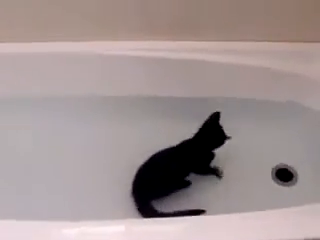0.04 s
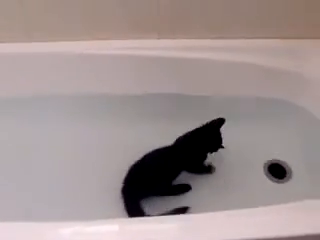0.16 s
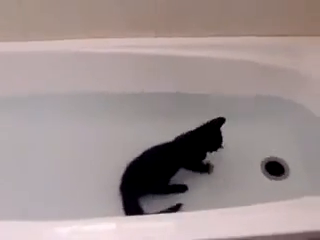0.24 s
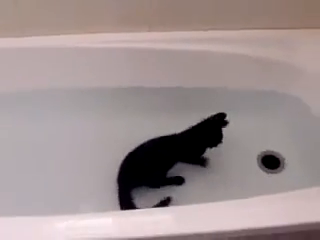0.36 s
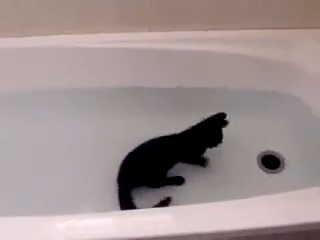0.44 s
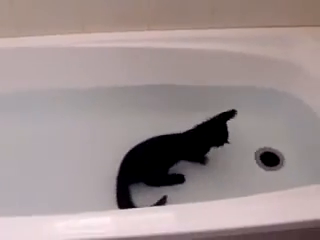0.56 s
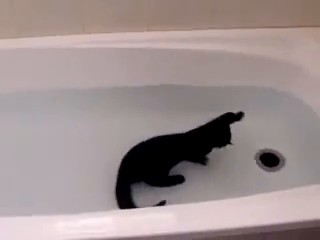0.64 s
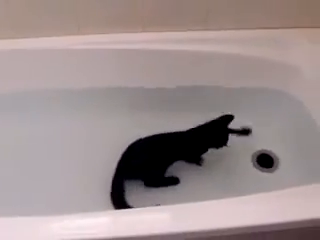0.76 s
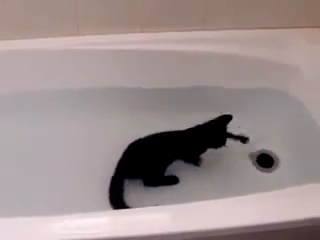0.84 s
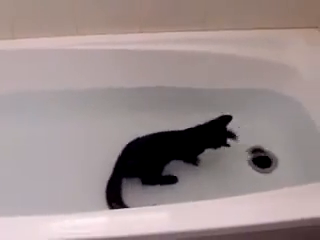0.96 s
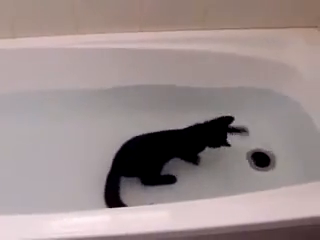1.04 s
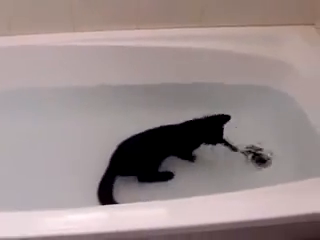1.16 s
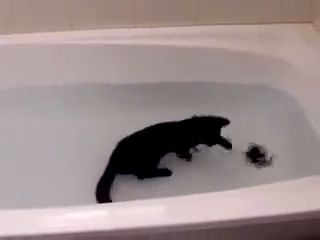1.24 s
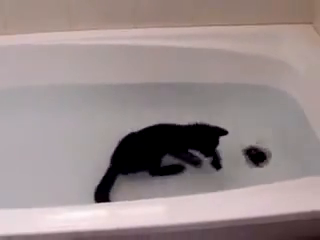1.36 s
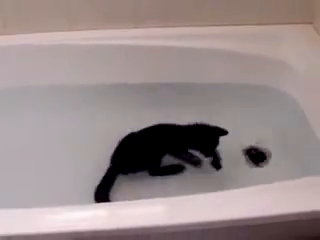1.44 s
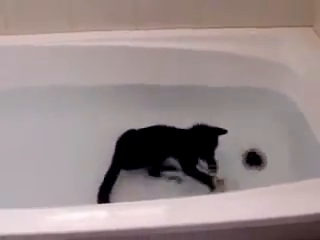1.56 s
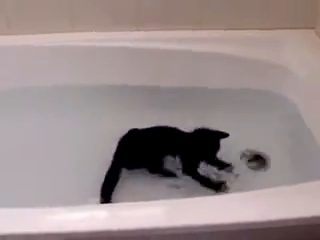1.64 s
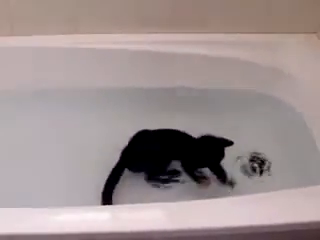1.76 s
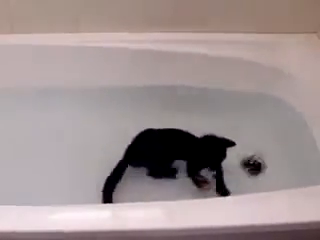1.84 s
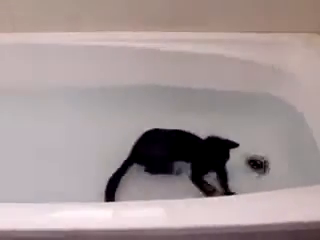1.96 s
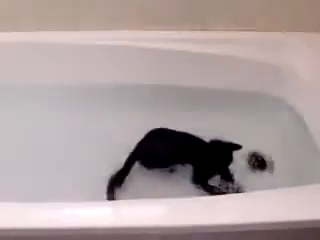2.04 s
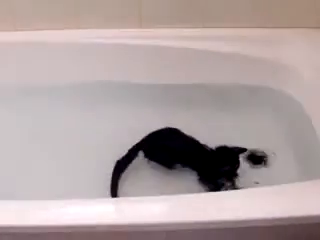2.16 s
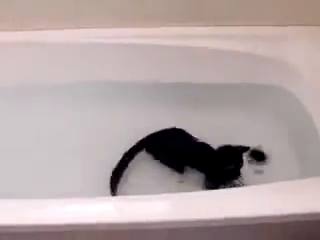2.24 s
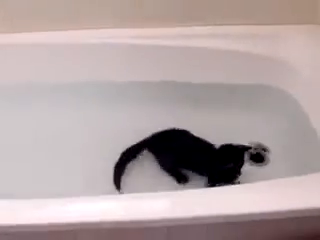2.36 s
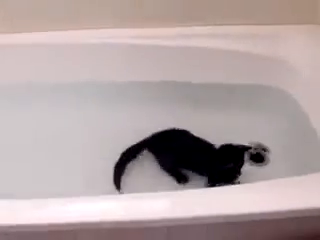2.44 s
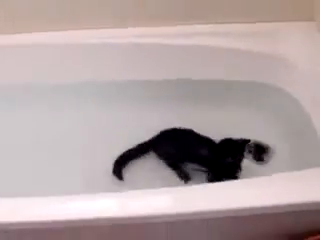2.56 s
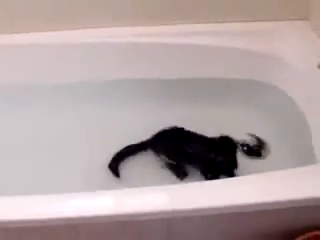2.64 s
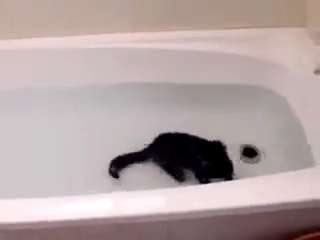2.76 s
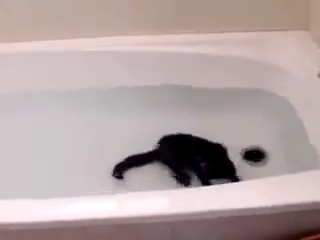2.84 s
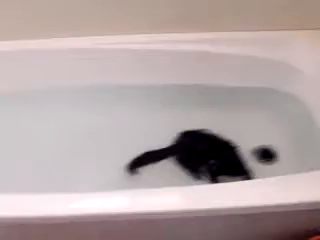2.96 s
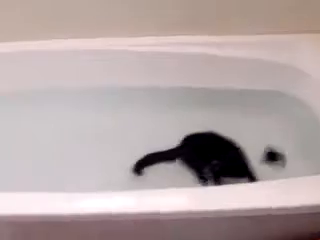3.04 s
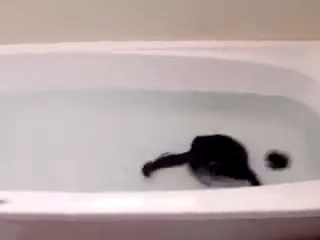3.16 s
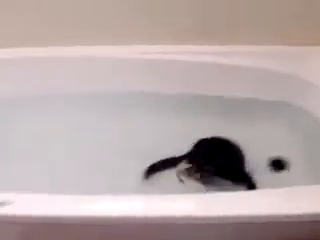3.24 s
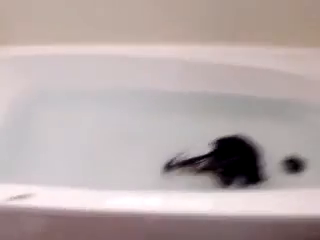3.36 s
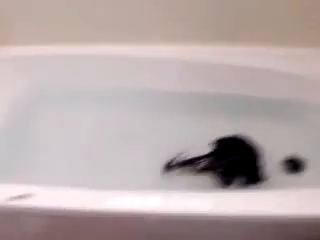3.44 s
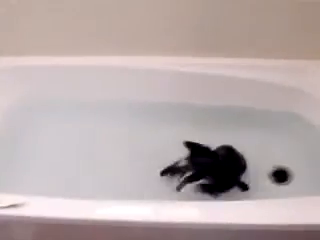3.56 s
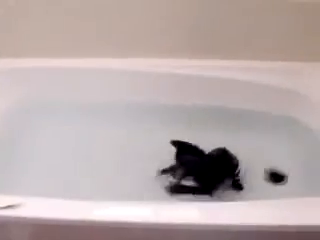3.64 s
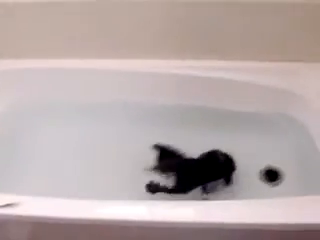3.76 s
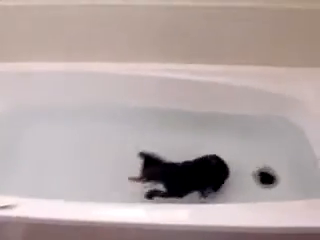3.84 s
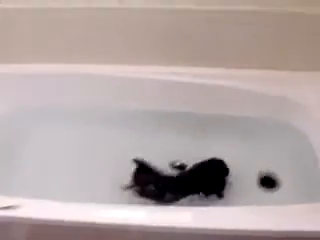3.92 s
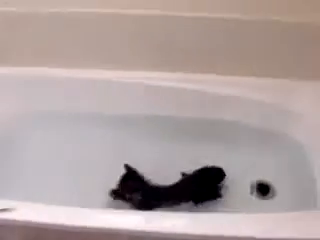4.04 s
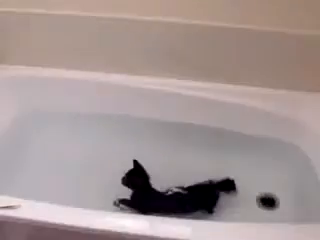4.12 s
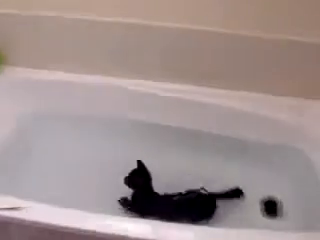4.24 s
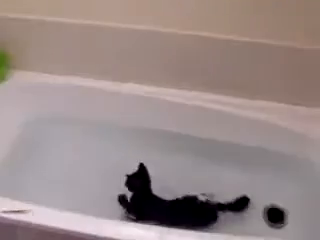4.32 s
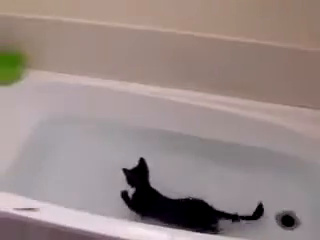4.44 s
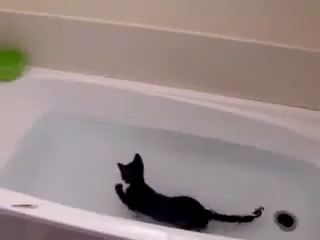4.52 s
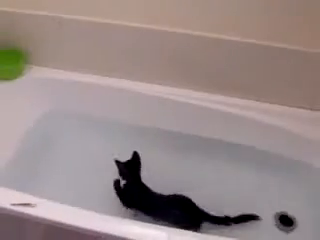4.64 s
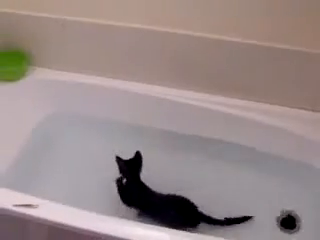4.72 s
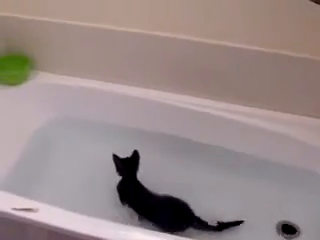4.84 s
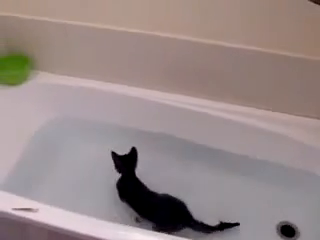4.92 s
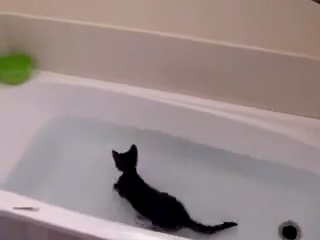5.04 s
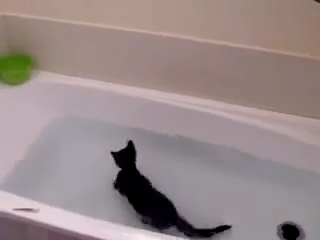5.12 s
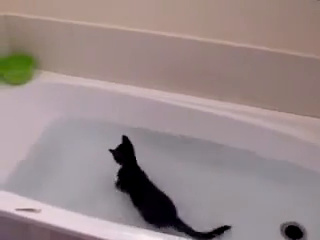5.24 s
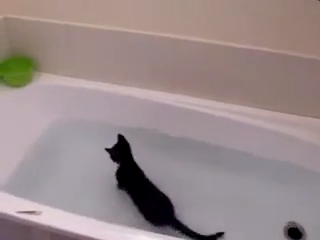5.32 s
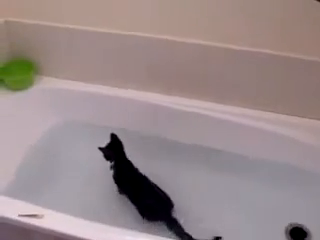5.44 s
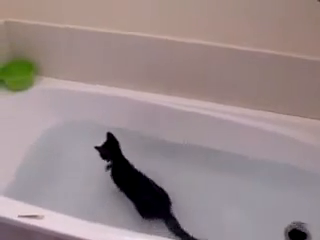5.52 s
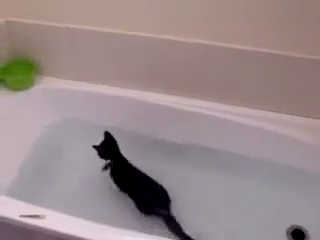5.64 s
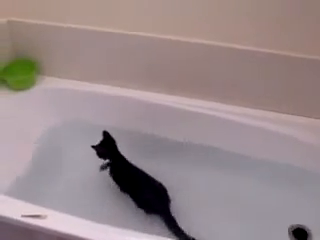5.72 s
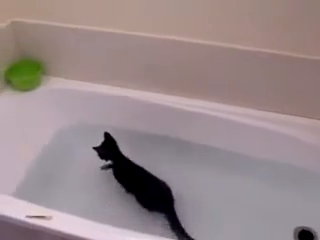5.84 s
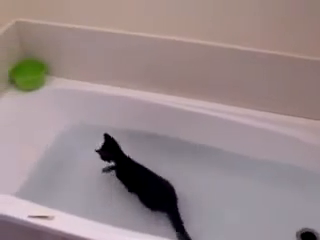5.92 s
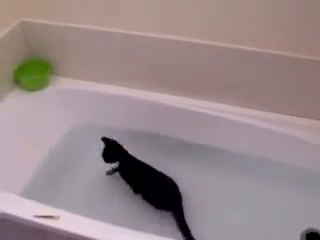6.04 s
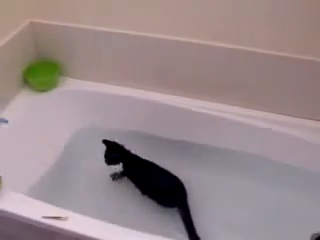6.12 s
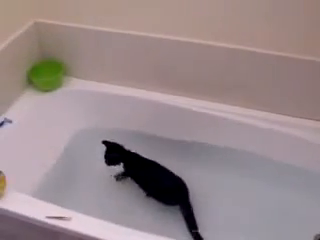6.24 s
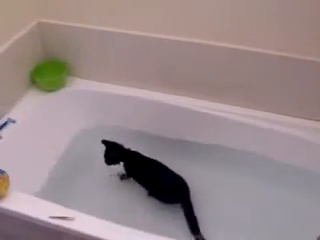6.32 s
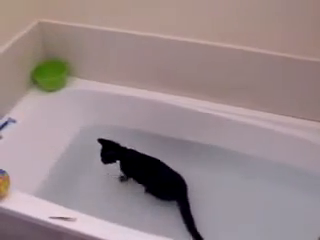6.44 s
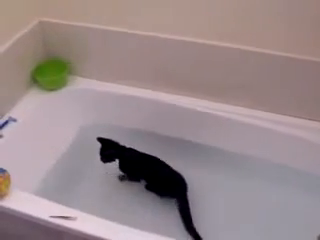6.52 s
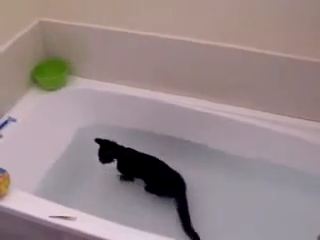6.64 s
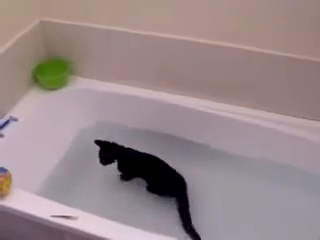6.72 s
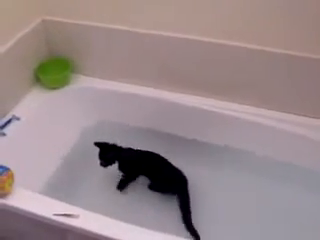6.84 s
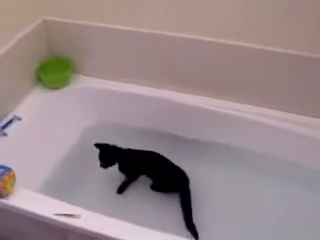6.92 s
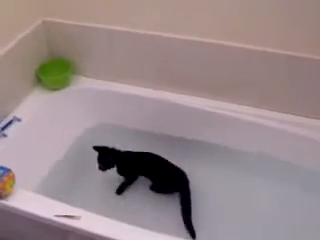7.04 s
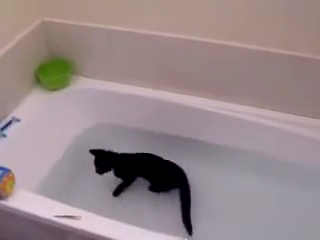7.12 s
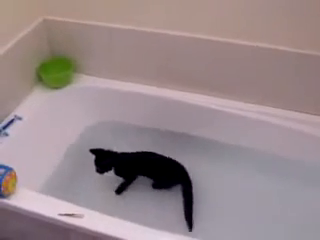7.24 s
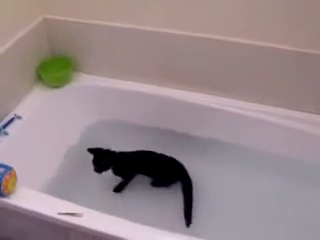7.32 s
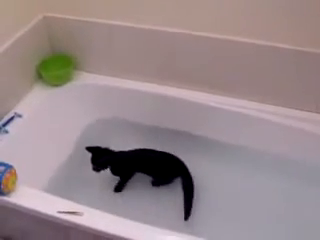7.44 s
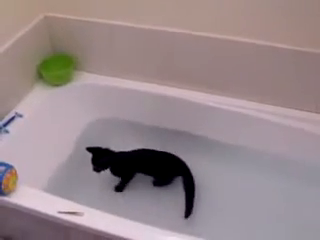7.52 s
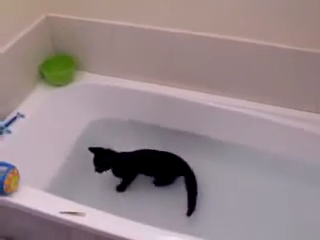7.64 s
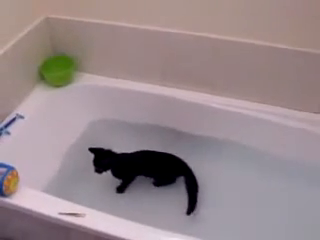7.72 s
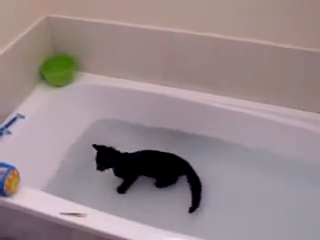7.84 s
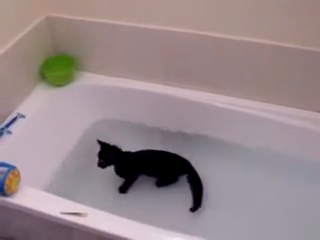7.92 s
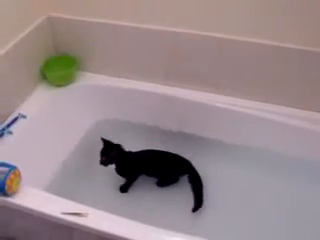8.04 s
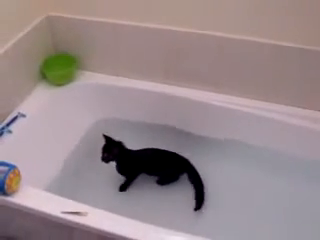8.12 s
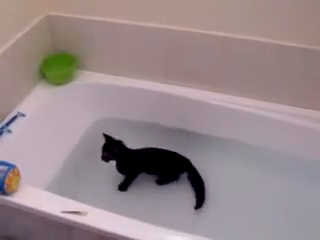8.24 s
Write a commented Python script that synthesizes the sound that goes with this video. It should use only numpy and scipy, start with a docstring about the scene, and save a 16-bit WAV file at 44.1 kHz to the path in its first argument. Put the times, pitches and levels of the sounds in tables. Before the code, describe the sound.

Soft hiss and low hum fill a tiled bathroom. After a second a kitten's paw slaps shallow bathtub water, and a run of bright splashes, drops and bubbly plops follows. It thins to near quiet, then a second splashy burst peaks with the hardest thumps. Drips die away, leaving faint room noise and a few dry plastic clicks close to the small, dull-trebled handheld microphone.

```python
"""In a tiled bathroom, a kitten paws and wades through shallow water in a bathtub.
Bubbles plop and slaps knock as short damped sines of climbing pitch; sprayed water is a dense patter of drops.
Noise that dies at its own speed at each pitch makes the room ring after the water.
The hand-held camera's plastic shell ticks, dry and close: short pushes ring its modes.
Under it lie shaped noise for a soft hiss, hum and grip rumble, and a few thin steady-pitched tones."""
import sys
import numpy as np
from scipy import signal
from scipy.fft import rfft, irfft, next_fast_len
from scipy.io import wavfile
from scipy.ndimage import uniform_filter1d, map_coordinates

SR = 44100
rng = np.random.default_rng(int(sys.argv[2]) if len(sys.argv) > 2 else 0)


def level_to_linear(level):
    """Convert decibel levels to linear amplitude factors, elementwise."""
    exponent = np.asarray(level, float) / 20
    return 10 ** exponent


def file_out(sig):
    """Save sig as 16-bit WAV at sys.argv[1]."""
    # one column per channel
    cols = np.atleast_2d(sig).T
    # limit, then scale
    lim = np.clip(cols, -1, 1)
    pcm = np.round(lim * 32767).astype(np.int16)
    wavfile.write(sys.argv[1], SR, pcm)


N = 364795  # length in samples


def unit(x):
    """Scale to an rms (average strength) of 1."""
    return x / np.sqrt(np.mean(x ** 2) + 1e-20)


def along(points, hz):
    """Read a curve of (Hz, value) points, with pitch on a log axis."""
    point_hz, value = np.transpose(points)
    return np.interp(np.log(hz + 1), np.log(point_hz + 1), value)


def curves(rows):
    """Turn each column after the time into one value per sample."""
    s, *columns = np.transpose(rows)
    return [np.interp(np.arange(N) / SR, s, column) for column in columns]


def wobble(rate):
    """A smooth random curve with rate knots a second."""
    knots = rng.standard_normal(int(N * rate / SR) + 4)
    return map_coordinates(knots, [np.arange(N) * rate / SR])


def filtered(x, response):
    """Multiply the spectrum of x by a response that depends on frequency."""
    m = next_fast_len(len(x) + 8192)
    return irfft(rfft(x, m) * response(np.fft.rfftfreq(m, 1 / SR)), m)[:len(x)]


def shaped_noise(shape):
    """Random noise with the spectrum of a table of (Hz, dB), at rms 1."""
    return unit(filtered(rng.standard_normal(N), lambda hz: level_to_linear(along(shape, hz))))


# Colour of the hiss after the microphone; only the shape counts.
# Columns: pitch_hz [Hz], level_db [dB per Hz]
HISS_COLOUR = [(530, -49.5), (900, -22.5), (941, -10.5), (1870, -10), (2680, -5.5), (3150, -6.5),
               (3410, -5), (5600, -15), (7750, -38), (10100, -59.5), (17000, -120)]


def hiss():
    """Steady noise, shaped so that the microphone's filter brings it to its listed colour."""
    return unit(filtered(rng.standard_normal(N), lambda hz: level_to_linear(along(HISS_COLOUR, hz) - along(MIC_RESPONSE, hz))))


def patchy(x, patchy_db):
    """Random gain patches some 300 Hz wide and 100 ms long make a noise lumpy."""
    z = signal.stft(x, nperseg=512)[2]
    field = uniform_filter1d(rng.standard_normal(z.shape), size=4, axis=0)
    field = uniform_filter1d(field, size=16, axis=1)
    return unit(signal.istft(z * level_to_linear(patchy_db * unit(field)), nperseg=512)[1][:N])


# Colour of the hum; only the shape counts.
# Columns: pitch_hz [Hz], level_db [dB per Hz]
HUM_COLOUR = [(65, -23), (110, -1), (300, -5), (550, -5.5), (800, -9), (1200, -14.5), (2000, -16),
              (4000, -120)]


def hum():
    """Low noise whose level varies in patches over pitch and time."""
    return patchy(shaped_noise(HUM_COLOUR), patchy_db=1.8)


# Colour of the grip rumble; only the shape counts.
# Columns: pitch_hz [Hz], level_db [dB per Hz]
RUMBLE_COLOUR = [(12, -21), (25, -2), (60, -4), (110, -8.5), (200, -35.5)]
# The hand shifts on the camera; grip() raises every level by 5.5 dB.
# Columns: middle_s [s], level_db [dB], half_length_s [s, where the swell is down to 1/e]
HAND_SHIFTS = [(0.0, -64.5, 0.32), (0.526, -49.5, 0.056), (1.89, -67, 0.64), (2.847, -58, .1),
               (3.153, -52.5, 0.03), (3.475, -66, 0.092), (4.304, -54, .15), (7.42, -60, 0.039)]


def grip():
    """Low noise from the hand on the camera: a faint resting level, swelling at each shift."""
    resting_db = -65  # before the 5.5 dB below
    t = np.arange(N) / SR
    swell = level_to_linear(resting_db)
    for s, db, half in HAND_SHIFTS:
        swell = swell + level_to_linear(db) * np.exp(-((t - s) / half) ** 2)
    return level_to_linear(5.5) * swell * shaped_noise(RUMBLE_COLOUR)


# Thin tones on multiples of one base pitch.
# Columns: multiple [times the base], level_db [dB rms before wavering and the microphone]
WHINE_TONES = [(9, -72), (11, -70), (12, -78.5), (13, -74), (14, -75.5)]


def whine(base_hz=300):
    """Sines of steady pitch that waver slowly in level."""
    t = np.arange(N) / SR
    tones = np.zeros(N)
    for multiple, db in WHINE_TONES:
        level = level_to_linear(db + 3 + 1.5 * wobble(3))  # a sine peaks 3 dB over its rms
        tones += level * np.sin(2 * np.pi * multiple * base_hz * t)
    return tones


# Slow drift of the background; air() lowers the hum by 3 dB and makes both levels waver.
# Columns: start_s [s], hiss_db [dB], hum_db [dB]
AIR_LEVELS = [(0, -45, -51), (.4, -46, -51.5), (.95, -51.5, -50), (2.7, -58.5, -51.5), (3.2, -61.5, -55),
              (3.65, -51, -50.5), (4.9, -55, -53), (6, -55, -56.5), (6.8, -55, -52.5), (7.4, -58.5, -55.5),
              (7.75, -56.5, -58), (8.1, -58, -53.5), (8.27, -54, -55.5)]


def air():
    """The background: wavering hiss and hum, the rumble of the grip and the thin tones."""
    hiss_db, hum_db = curves(AIR_LEVELS)
    hiss_level = level_to_linear(hiss_db + 0.58 * wobble(9.2))
    hum_level = level_to_linear(hum_db - 3.0 + 0.89 * wobble(4.7))
    return hiss_level * hiss() + hum_level * hum() + grip() + whine()


def bubbles(s, hz, gain, cycles, rise, size):
    """Damped sines of climbing pitch, as when an air pocket nears the surface."""
    turn = np.arange(size) / SR * hz[:, None]
    age = turn / cycles[:, None]  # level falls by a factor e per unit of age
    climbing = turn * (1 + rise * np.minimum(age, 2) / 2)
    envelope = np.exp(-age) * (1 - np.exp(-4.5 * age)) ** 2
    wave = np.sin(2 * np.pi * climbing) * envelope
    at = np.round(s * SR).astype(int)[:, None] + np.arange(size)
    return np.bincount(at.ravel(), (gain[:, None] * wave).ravel(), N + size)[:N]


# Clear bubbles, slaps and knocks; plops() adds a gain to each level and lengthens the shortest lives.
# Columns: start_s [s], pitch_hz [Hz], level_db [dB], life_cycles [cycles]
CLEAR_PLOPS = [(0.47, 4340, -32, 4.5), (0.536, 274, -43, 5.3), (0.964, 3300, -37.5, 8.2),
               (1.105, 3260, -18, 2.36), (1.172, 2940, -23.5, 18), (1.172, 3780, -28, 9.2),
               (1.182, 4480, -28, 16), (1.188, 1400, -44.5, 9.1), (1.2394, 4510, 2, 4.5),
               (1.2395, 5740, -2, 6.2), (1.2401, 1944, -21.5, 6.7), (1.2402, 6860, -4.5, 5.2),
               (1.24, 4200, -8, 5.4), (1.307, 1890, -27.5, 14), (1.388, 1677, -26, 7.5),
               (1.473, 3580, -35.5, 20), (1.5039, 3900, -13.5, 6.8), (1.547, 1226, -36, 7.3),
               (1.559, 2070, -23, 5.9), (1.592, 1046, -45, 19), (1.636, 2680, -29.5, 23),
               (1.646, 1760, -31.5, 13.3), (1.651, 3900, -19, 4.9), (1.675, 1330, -30, 8.6),
               (1.7, 1155, -28.5, 8), (1.735, 2300, -25, 8.8), (1.741, 4180, -3.5, 4.3),
               (1.741, 6630, -14, 3.1), (1.747, 1755, -19, 4.5), (1.767, 3500, -9, 6.8),
               (1.803, 1003, -24.5, 3.7), (1.819, 2120, -13.5, 2.2), (1.878, 2590, -10.5, 2.1),
               (1.879, 4530, -8, 3.3), (1.882, 1022, -22, 7.3), (1.934, 982, -31.5, 8.2),
               (1.967, 1610, -23, 4.5), (1.986, 3100, -15, 3.5), (2.032, 4070, -25, 13),
               (2.035, 1766, -26.5, 12), (2.074, 5780, -19.5, 5.2), (2.136, 2730, -14, 3.3),
               (2.136, 3590, -17.5, 7.9), (2.197, 780, -18.5, 6.3), (2.242, 1047, -31.5, 25),
               (2.25, 1947, -15.5, 5.1), (2.269, 1375, -28, 9.6), (2.285, 3530, -8.5, 2.2),
               (2.285, 6000, -20, 2.7), (2.286, 890, -21, 4.2), (2.293, 616, -35.5, 9.4),
               (2.295, 745, -20.5, 12.4), (2.497, 3200, -31.5, 3.4), (2.574, 3290, -29.5, 5.4),
               (2.767, 1016, -44.5, 12), (3.371, 4940, -28, 3.1), (3.389, 1934, -35.5, 9.1),
               (3.405, 2470, -31.5, 3.7), (3.443, 965, -33.5, 7.1), (3.445, 4180, -26.5, 7.7),
               (3.503, 3160, -38, 21), (3.782, 3580, -26, 14), (3.799, 3000, -15, 6), (3.801, 4130, -23, 7),
               (3.882, 5440, -26, 13), (3.807, 1077, -27, 4.4), (3.808, 1750, -22, 4),
               (3.817, 2540, -21, 12), (3.893, 3700, -14, 7.9), (3.958, 4280, -21.5, 20),
               (3.989, 1730, -23, 3.5), (4.032, 4770, -23, 15), (4.04, 2660, -17, 1.9),
               (4.06, 144.3, -33, 3.6), (4.066, 672, -22, 11.3), (4.068, 2016, -17.5, 6.1),
               (4.07, 3370, -14.5, 5.1), (4.085, 873, -29.5, 24), (4.095, 1160, -21, 3.8),
               (4.141, 723, -25.5, 6.5), (4.186, 2380, -3, 2.1), (4.185, 5300, -24, 30),
               (4.131, 4380, -29.5, 36), (4.196, 171.5, -37.5, 10.7), (4.196, 3650, -7.5, 5.3),
               (4.198, 317, -24, 7.4), (4.203, 1296, -17, 5.5), (4.219, 670, -31.5, 3),
               (4.219, 5320, -25.5, 27), (4.246, 284, -23, 3.3), (4.26, 1435, -29, 21),
               (4.338, 1070, -18, 2), (4.34, 3970, -22, 13), (4.346, 2495, -15.5, 6.7),
               (4.426, 4100, -24, 14), (4.588, 339, -38, 11.3), (4.592, 795, -34, 4.2),
               (4.719, 1015, -41, 5.6), (4.823, 4200, -35.5, 3.3), (4.853, 1310, -46.5, 6),
               (4.86, 306, -47, 2), (4.896, 2840, -34.5, 4), (4.91, 5220, -22, 4.9),
               (5.129, 2210, -39.5, 4.9), (5.185, 4030, -45, 8.1), (5.242, 2580, -37, 2.2),
               (5.4, 540, -48, 3), (5.66, 617, -42.5, 1.5), (5.77, 218, -32, 3.3), (6.214, 747, -33.5, 3.2),
               (6.215, 186, -37, 2.9), (6.225, 349, -39, 3.4), (8.172, 278, -48, 3.2),
               (8.175, 1325, -47, 10.5)]


def plops():
    """Clear bubbles, and slaps and knocks built from several short damped sines; short ones are a bit weaker."""
    s, hz, db, life = np.transpose(CLEAR_PLOPS)
    life = np.maximum(life, 1.5)
    # the level dies by a factor e in half of the life
    return bubbles(s, hz, level_to_linear(db + 6.0 - 2.0 / life), life / 2, rise=0.012, size=3600)


def tub(x, size=1500):
    """The direct sound with a dense, quickly dying cluster of answers from the hard tub."""
    answer_db, t60_s = -1, 0.013
    answer = rng.standard_normal(size) * level_to_linear(-60 * np.arange(size) / SR / t60_s)
    late = signal.fftconvolve(x, answer / np.linalg.norm(answer))
    return x + level_to_linear(answer_db) * np.pad(late, (20, 0))[:N]


# How long the tiled room rings at each pitch.
# Columns: pitch_hz [Hz], t60_s [s to fall by 60 dB]
TILE_RING = [(150, 0.35), (400, 0.44), (1000, 0.48), (2800, 0.43), (7000, 0.33)]


def bathroom(x, lump_db, size=16384):
    """Each frequency dies at its own speed; a fresh noise tail is drawn for each overlapping piece."""
    out = np.zeros(N + 3 * SR)
    fade = np.hanning(2 * size + 1)[:-1]  # overlapping pieces blend into each other
    padded = np.pad(x, (size, 2 * size))
    for start in range(0, N + size, size):
        hz, t, z = signal.stft(rng.standard_normal(SR * 3 // 4), SR, nperseg=256)
        decay = level_to_linear(-60 * t / along(TILE_RING, hz)[:, None])
        tail = signal.istft(z * decay, SR, nperseg=256)[1]
        lumps = np.repeat(rng.standard_normal(len(tail) // 64 + 1), 64)[:len(tail)]
        tail *= level_to_linear(lump_db * lumps)  # short stretches of the tail stand out
        piece = padded[start:start + 2 * size] * fade
        echo = signal.fftconvolve(piece, tail / np.linalg.norm(tail))
        out[start:start + len(echo)] += echo
    return np.pad(out[size:], (90, 0))[:N]  # the echo starts 2 ms late


# Ringing modes of the plastic shell; each tick varies their levels a little.
# Columns: pitch_hz [Hz], width_hz [Hz], level_db [dB]
SHELL_MODES = [(380, 1200, -40), (705, 20, -8), (1160, 600, -1.5), (1750, 250, 5.5), (2530, 157, 5.5),
               (3170, 140, -12.5), (3800, 140, -45), (5260, 470, -21)]
# Ticks of the shell; ticks() adds 20.5 dB to each level and 12 dB to each sharpness.
# Columns: start_s [s], level_db [dB], sharpness_db [dB, tilt toward the treble]
SHELL_TICKS = [(0.912, -20, -23), (2.971, -10.5, -13.5), (4.608, -12.5, -18), (6.572, -4.5, -13.5),
               (6.871, -7.5, -18.5), (7.027, -4, -15), (7.039, -22, -24), (7.047, -9.5, -38),
               (7.075, -7, -18.5), (7.417, -33, -12), (7.824, -6, -24.5), (7.905, -7.5, -29),
               (7.951, -26.5, -33), (7.989, -10.5, -45), (8.014, -20, -50), (8.055, -41, -19)]


def ticks(size=4096):
    """Each tick is a short push that rings the shell; sharper pushes reach its upper modes."""
    out = np.zeros(N + size)
    f, t = np.fft.rfftfreq(size, 1 / SR), np.arange(size) / SR
    for s, db, sharp_db in SHELL_TICKS:
        strength = level_to_linear(rng.normal(0, 1.2, len(SHELL_MODES)))
        ring = 0
        for k, (gain, (center, width, level)) in enumerate(zip(strength, SHELL_MODES)):
            mode = 1j * f * width / (center * center - f * f + 1j * f * width)
            ring = ring + gain * level_to_linear(level) * mode * (-1) ** min(k + 1, 5)  # the low modes alternate in sign
        push = level_to_linear((sharp_db + 12.0) * np.minimum(f / 2500, 1.3) ** 2 - 12.5 * (f / 6000) ** 2)
        # a short noisy tail of early reflections follows the push
        reflections = level_to_linear(-33.5 - 60 * t / 0.038) * rng.standard_normal(size)
        reflections[0] = 1  # the direct sound
        tick = np.roll(irfft(ring * push * rfft(reflections), size), 20)  # keeps the onset from wrapping round
        start = round((s + .0009) * SR)
        out[start:start + size] += level_to_linear(db + 20.5) * tick
    return out[:N]


def drops(count, centre_hz, spread, cycles, uneven_db, size):
    """A dense patter of drops of scattered pitch and strength, rms 1."""
    draw = rng.random((count, 2))
    hz = np.clip(centre_hz * np.exp(spread * rng.standard_normal(count)), 300, 9000)
    gain = level_to_linear(-uneven_db * np.log(1 - draw[:, 1]))
    return unit(bubbles(draw[:, 0] * N / SR, hz, gain, np.full(count, cycles), rise=0.193, size=size))


def strokes(s, db, t60):
    """Rms level of falling water: each stroke rises fast and dies away; their powers add."""
    rise_s = 0.004
    age = np.maximum(np.arange(N) / SR - s[:, None], 0)
    level = level_to_linear(db[:, None] - 60 * age / t60[:, None]) * np.minimum(age / rise_s, 1)
    return np.sqrt(np.sum(level ** 2, axis=0))


def strays(s, stroke_db, t60, centre_hz, cycles, count):
    """Every stroke leaves a few chance bubbles in the water that it threw, fading with it."""
    s, stroke_db, t60 = np.repeat([s, stroke_db, t60], count, axis=1)
    draw, scatter = rng.random((len(s), 1)), rng.standard_normal((len(s), 3))
    late = draw[:, 0] * t60 / 2
    hz = np.clip(centre_hz * np.exp(.33 * scatter[:, 0]), 500, 7000)
    db = stroke_db - 60 * late / t60 + 3 * scatter[:, 1]
    return bubbles(s + late, hz, level_to_linear(db), cycles * np.exp(.4 * scatter[:, 2]), rise=0.031, size=3000)


# Colour of the low thump; only the shape counts.
# Columns: pitch_hz [Hz], level_db [dB per Hz]
SLOSH_COLOUR = [(60, -43.5), (110, -9.5), (180, -1.5), (300, -9), (500, -31)]


def slosh(stroke_level):
    """Moved water thumps the tub: low noise that follows the strokes, with their loudness range narrowed."""
    full_stroke_db, follow = -43, 0.47  # follow: dB gained per dB of larger drops
    return level_to_linear(full_stroke_db) * stroke_level ** follow * shaped_noise(SLOSH_COLOUR)


# Paw strokes that throw water; spray() shortens the fall of the larger drops to 0.9 of t60_s.
# Columns: start_s [s], fine_db [dB rms], large_db [dB rms], t60_s [s for the spray to fall by 60 dB]
PAW_STROKES = [(0.95, -54.5, -60, 1.4), (1.168, -40, -56, 0.27), (1.24, -28, -51, 0.73),
               (1.51, -48, -68, 0.67), (1.56, -42, -42.5, 3.6), (1.741, -25.5, -26, .45),
               (1.872, -38.5, -42, 1.74), (2.128, -36.5, -37.5, 0.19), (2.287, -53, -45.5, 0.4),
               (2.57, -68.5, -82, 0.17), (2.85, -50, -85, 0.57), (3.05, -62, -67, 1.7),
               (3.42, -52.5, -46, 0.39), (3.79, -37.5, -39, 0.63), (3.89, -33, -44.5, 0.75),
               (3.958, -40.5, -58.5, 0.25), (4.059, -39, -32, 0.46), (4.185, -23.5, -25, .35),
               (4.34, -31.5, -35.5, 0.24), (4.5, -58, -76, 2), (4.9, -64, -85, 0.68), (5.18, -60, -63, 1.7)]


def spray():
    """Thrown water falls back as fine spray, larger drops and stray bubbles, and sloshes low in the tub."""
    fine = drops(count=3500, centre_hz=4400, spread=.33, cycles=5, uneven_db=2.6, size=500)
    large = drops(count=900, centre_hz=1900, spread=.22, cycles=8, uneven_db=2.6, size=1300)
    s, fine_db, large_db, t60 = np.transpose(PAW_STROKES)
    large_t60 = 0.9 * t60
    fine_level = strokes(s, fine_db, t60)
    large_level = strokes(s, large_db, large_t60)
    small_bubbles = strays(s, large_db + 2, large_t60, centre_hz=1575, cycles=4.3, count=4)
    tiny_pings = strays(s, fine_db + 5, t60, centre_hz=3900, cycles=9.5, count=8)
    return fine_level * fine + large_level * large + small_bubbles + tiny_pings + slosh(large_level)


def scene():
    """Water in the ringing tub and room, ticks and air at the microphone."""
    clear = plops()
    thrown = spray()
    echo = bathroom(clear + thrown, lump_db=0.5)
    return (tub(clear) + thrown + level_to_linear(6.0) * echo + ticks() + air())[None]


# How strongly the small microphone passes each pitch.
# Columns: pitch_hz [Hz], level_db [dB]
MIC_RESPONSE = [(60, -7.5), (300, 1), (4500, 0), (5500, -5), (5950, -13.5), (6600, -9), (7500, -16),
                (8300, -40), (9000, -38.5), (12000, -56.5), (22000, -100)]


def microphone(x):
    """A small microphone filters the sound and loses the treble."""
    return filtered(x, lambda hz: level_to_linear(along(MIC_RESPONSE, hz)))


def overload(x):
    """The input rounds off loud peaks; a lopsided part adds a low jolt and overtones."""
    x = x / (1 + np.abs(x / .75) ** 6) ** (1 / 6)
    return x + .45 * np.maximum(np.abs(x) - .5, 0)


def band_limit(x):
    """A steep low-pass at the top of the band."""
    return signal.sosfilt(signal.butter(12, 10000, fs=SR, output="sos"), x)


def record(dry):
    """A small microphone, an input that overloads on the loudest slap, then a steep treble cut."""
    x = overload(microphone(dry[0]))
    x = filtered(x, lambda hz: 1 / (1 + (hz / 8300) ** 12))
    return band_limit(x[None])


dry = scene()
out = record(dry)
file_out(out)
```